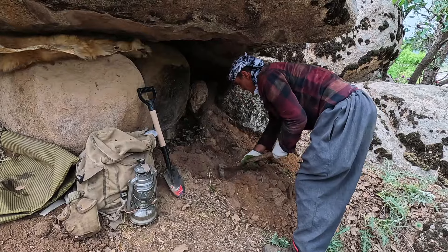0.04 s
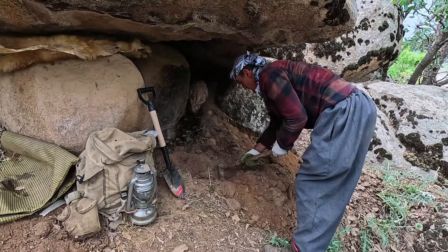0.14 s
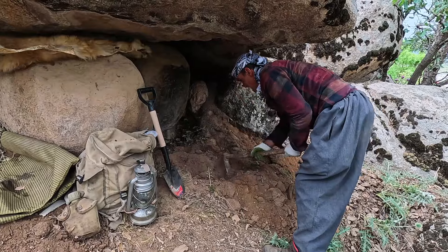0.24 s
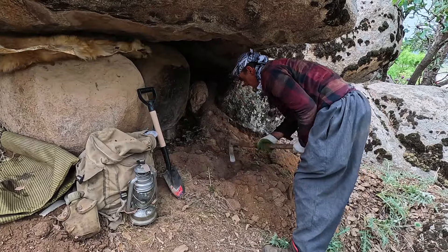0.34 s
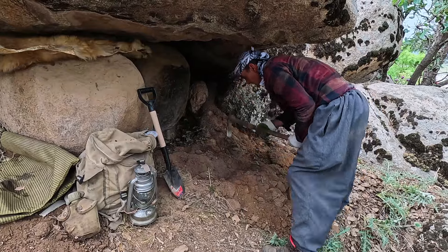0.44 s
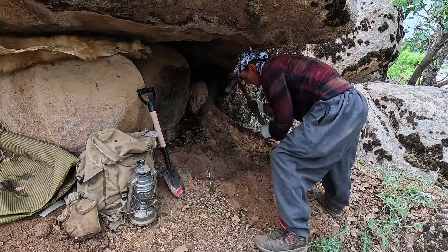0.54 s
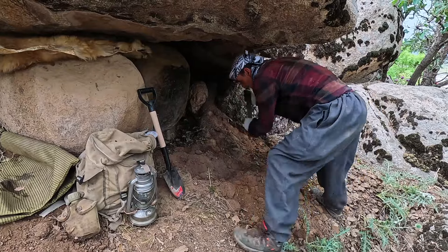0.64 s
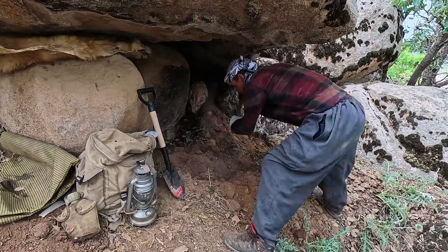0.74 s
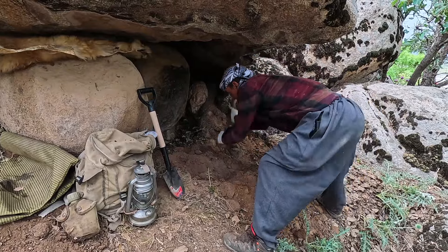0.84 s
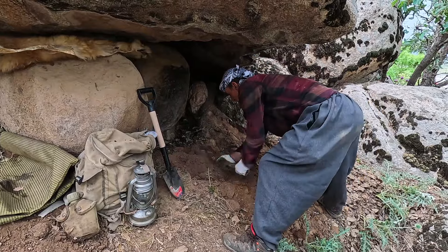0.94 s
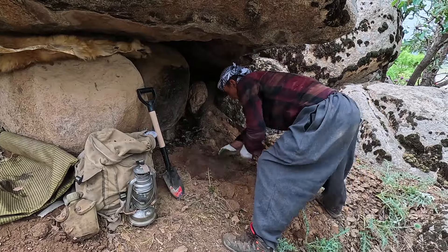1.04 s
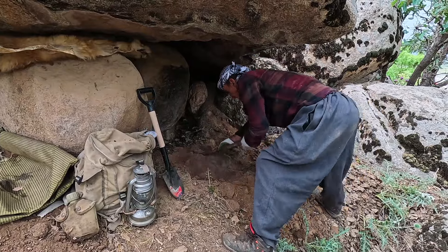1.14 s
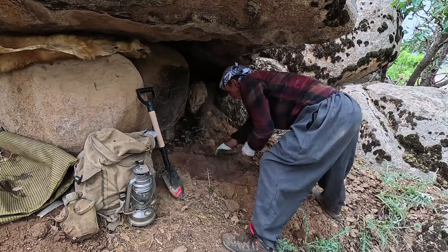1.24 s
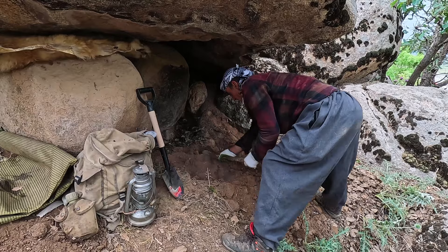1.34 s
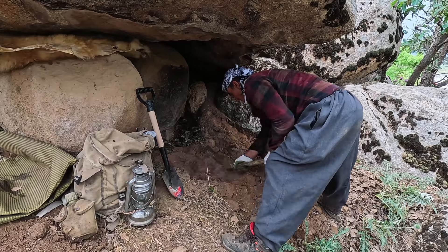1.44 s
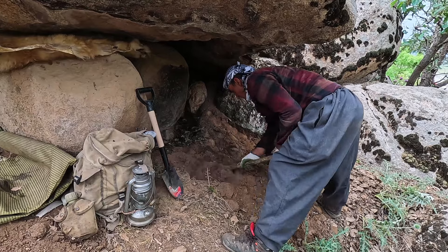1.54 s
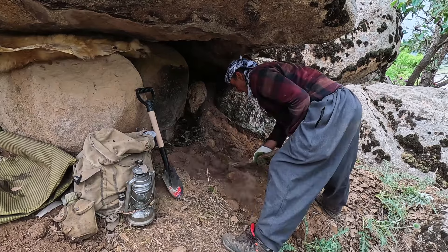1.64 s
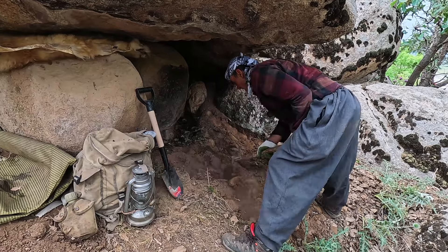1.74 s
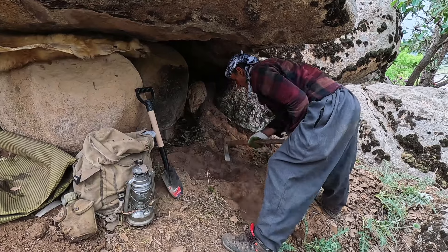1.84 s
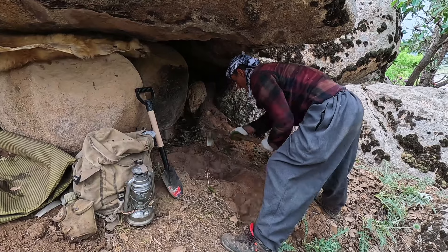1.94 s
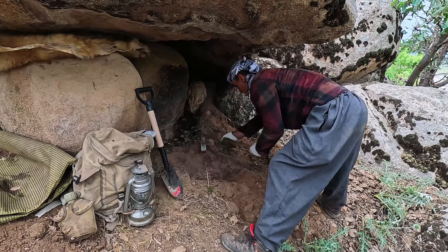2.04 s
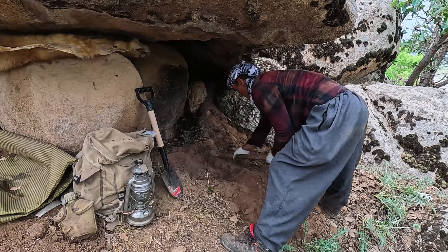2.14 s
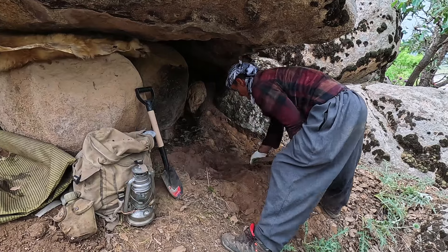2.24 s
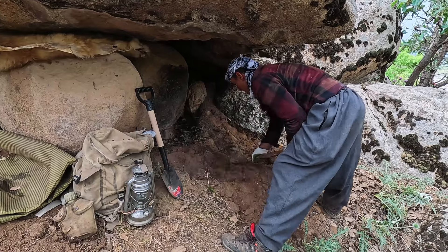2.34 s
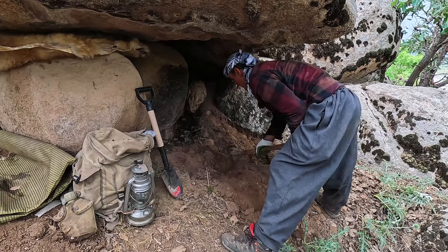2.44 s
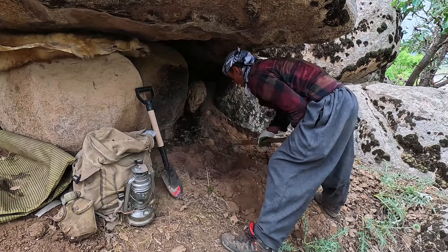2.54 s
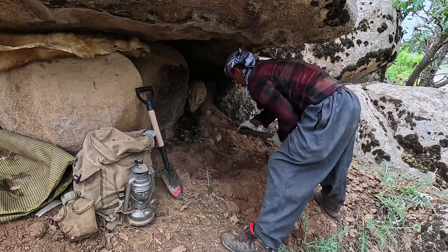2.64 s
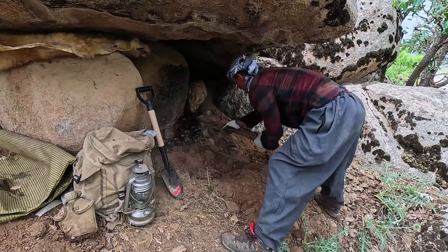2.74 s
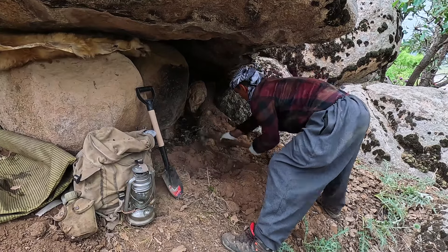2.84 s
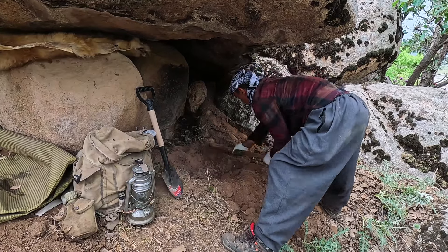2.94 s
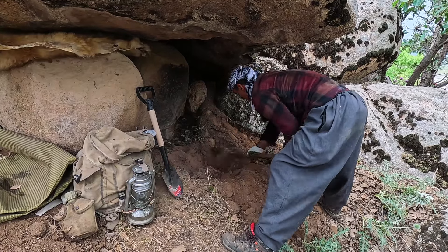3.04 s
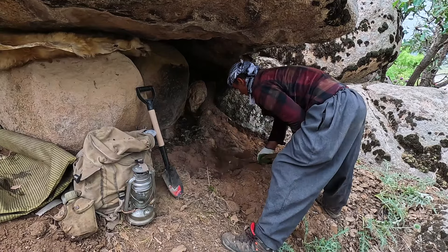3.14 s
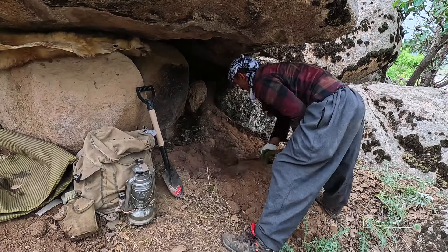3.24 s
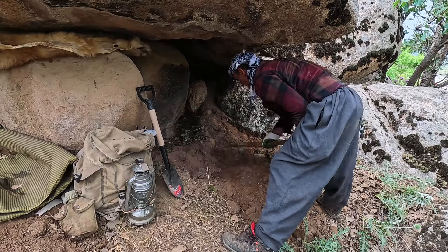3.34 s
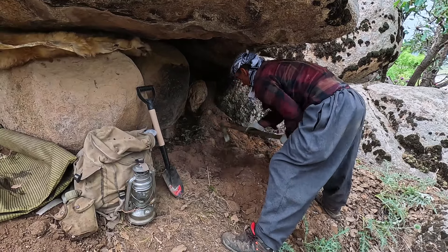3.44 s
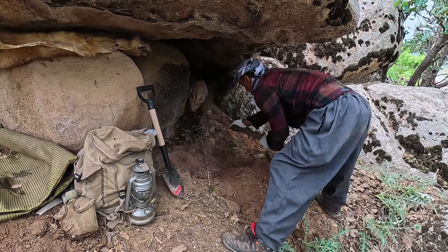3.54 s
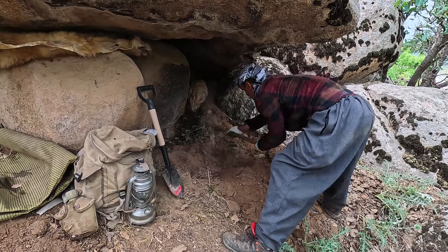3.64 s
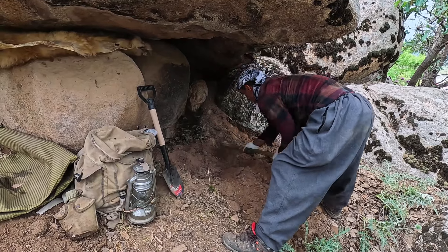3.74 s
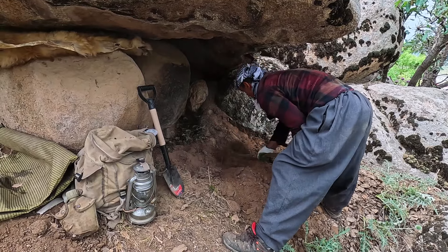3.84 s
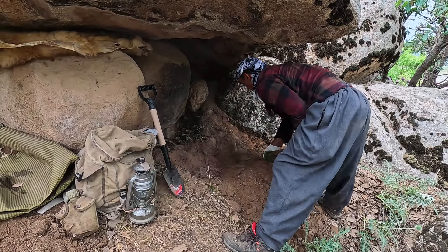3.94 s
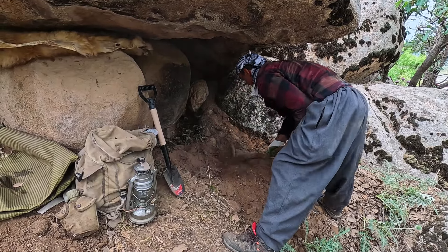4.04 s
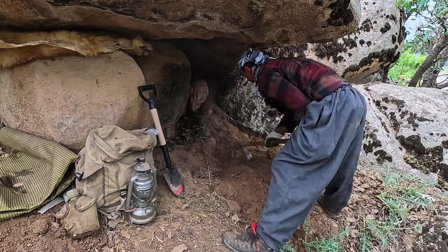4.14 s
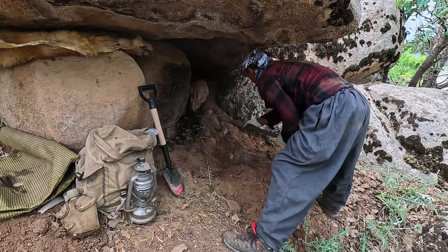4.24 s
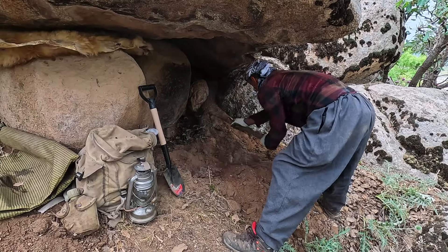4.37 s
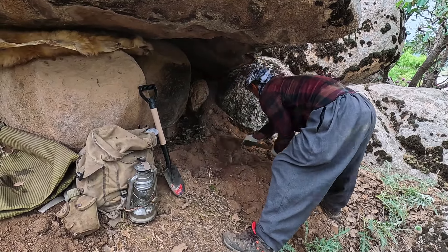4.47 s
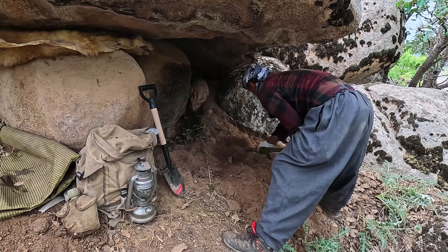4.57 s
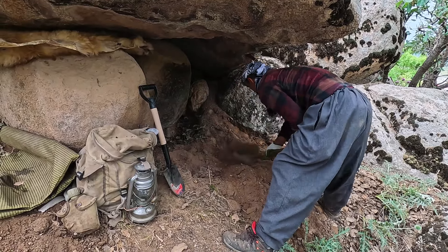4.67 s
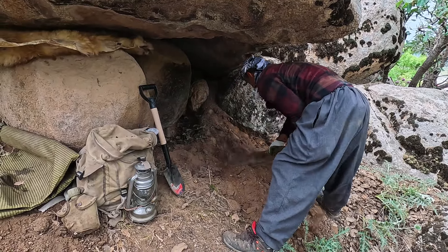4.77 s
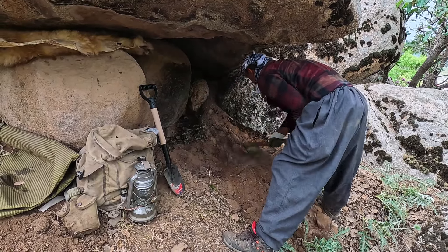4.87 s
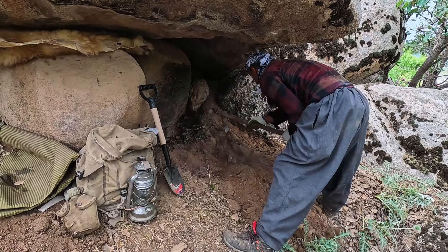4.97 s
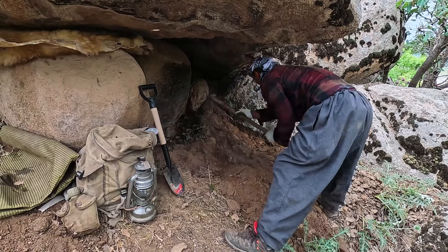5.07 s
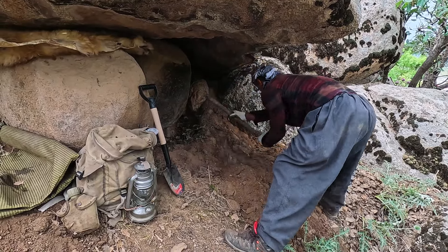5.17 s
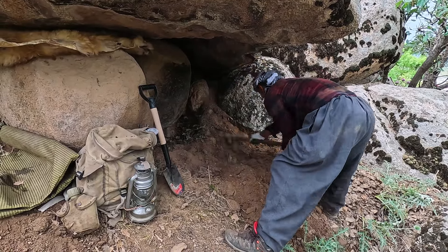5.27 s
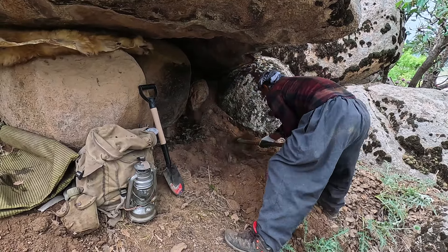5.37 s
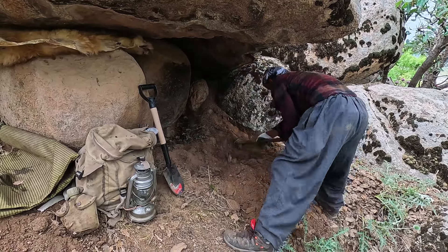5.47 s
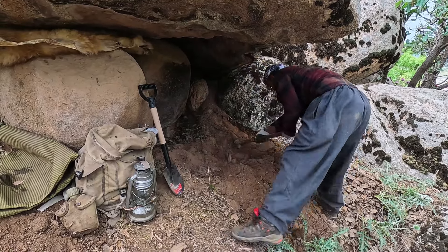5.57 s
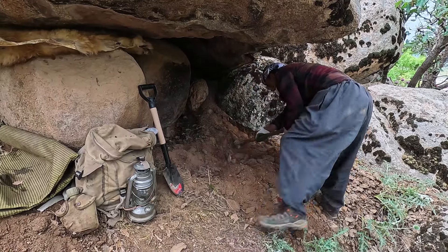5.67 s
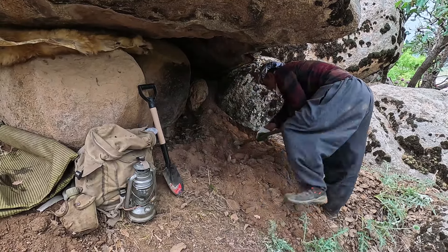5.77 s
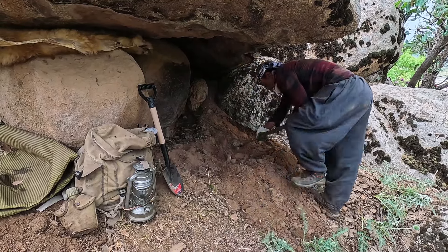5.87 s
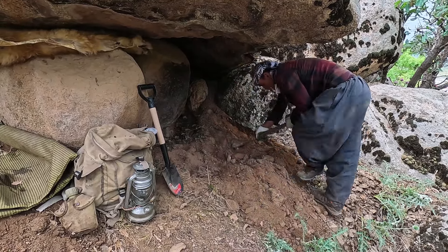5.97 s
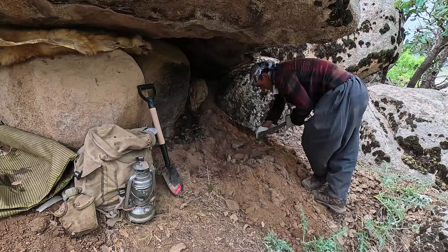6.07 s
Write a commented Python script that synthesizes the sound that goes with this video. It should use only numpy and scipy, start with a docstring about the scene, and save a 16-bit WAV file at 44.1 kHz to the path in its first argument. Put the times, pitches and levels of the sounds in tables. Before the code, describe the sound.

A short pick-mattock digs dry stony soil under a rock overhang, a few steps from the microphone. Irregular chops ring the steel blade briefly, and gritty scrapes follow as it drags through the earth. Clods crumble, gravel runs down a heap and pebbles click, most thickly near the end. Dull low thuds bump the microphone, mainly at the start. The rock gives a very short reflection.

```python
"""Under a rock overhang, a few steps from a camera: a short pick-mattock works dry stony soil.
The steel blade rings briefly at each blow and while it scrapes; clods crumble, gravel spills
and pebbles click, with a short answer from the rock. Low thuds reach the camera body;
its two microphones are nearly deaf to airborne bass."""
import sys
import numpy as np
from scipy import signal
from scipy.fft import rfft, irfft, next_fast_len
from scipy.io import wavfile
from scipy.ndimage import uniform_filter1d

SR = 44100
rng = np.random.default_rng(int(sys.argv[2]) if len(sys.argv) > 2 else 0)


def log_audio(samples):
    """Write samples as a 16-bit WAV file to the path given in sys.argv[1]."""
    # one column per channel
    frames = np.atleast_2d(samples).T
    # limit to full scale, then quantise
    limited = np.clip(frames, -1, 1)
    pcm = np.round(limited * 32767).astype(np.int16)
    wavfile.write(sys.argv[1], SR, pcm)


N = 269451


def amp(db):
    return 10 ** (np.asarray(db) / 20)


def unit(x):
    return x / np.sqrt(np.mean(x ** 2) + 1e-20)


def along(points, hz):
    """Reads (freq_hz, value) points on a log frequency axis."""
    f, v = np.transpose(points)
    return np.interp(np.log(hz + 1), np.log(f + 1), v)


def filtered(x, response):
    """x times a complex response of frequency."""
    size = next_fast_len(x.shape[-1] + 4096)
    return irfft(rfft(x, size) * response(np.fft.rfftfreq(size, 1 / SR)), size)[..., :x.shape[-1]]


def resonant(x, modes):
    """x through resonances (pitch_hz, width_hz, level_db) of alternating sign, at rms 1."""
    def response(f):
        return sum((-1) ** k * amp(db) * 1j * f * width / (hz * hz - f * f + 1j * f * width)
                   for k, (hz, width, db) in enumerate(modes))
    return unit(filtered(x, response))


def coloured(x, spectrum):
    """x shaped by (freq_hz, level_db) points, at rms 1."""
    return unit(filtered(x, lambda hz: amp(along(spectrum, hz))))


def grit(per_s, spread_db, life_s, bed):
    """Noise broken into dying grains, a few of them large, over a smooth bed."""
    starts = (rng.random(N) < per_s / SR) * amp(spread_db * np.minimum(rng.exponential(size=N), 4))
    grains = signal.lfilter([1], [1, -np.exp(-1 / (life_s * SR))], starts)
    return (unit(grains) + bed) * rng.standard_normal(N)


def patchy(x, depth_db, bins, frames):
    """Random patches of gain over time and frequency: the contact keeps changing what sounds."""
    spectra = signal.stft(x, nperseg=256)[2]
    patches = uniform_filter1d(rng.standard_normal(spectra.shape), bins, axis=0)
    patches = uniform_filter1d(patches, frames, axis=1)
    return unit(signal.istft(spectra * amp(depth_db * unit(patches)), nperseg=256)[1][:N])


def swells(rows):
    """Envelope of gestures (start_s, rise_s, hold_s, fall_s, level_db); a rise or fall spans 40 dB."""
    t = np.arange(0, N / SR + .002, .001)
    start, rise, hold, fall, db = np.transpose(rows)[..., None]
    top = start + rise
    early = np.clip((top - t) / (rise + .001), 0, 4) ** 1.3  # rounded at the top
    late = np.clip((t - top - hold) / (fall + .001), 0, 4) ** 0.9
    power = amp(db - 40 * (early + late)) ** 2
    return np.interp(np.arange(N) / SR, t, np.sqrt(power.sum(axis=0)))


def add(track, start_s, sound, peak_db):
    """Lays a short sound into a track at a given peak."""
    part = track[round(start_s * SR):][:len(sound)]
    part += amp(peak_db) / np.abs(sound).max() * sound[:len(part)]


# crunching soil and fine grit: freq_hz, level_db
SOIL_SPECTRUM = [(290, -68), (500, -1), (1600, -6.5), (2500, 0), (3700, -5), (5470, -11), (7750, -12.5),
                 (12900, -36.5), (16000, -57)]
GRIT_SPECTRUM = [(3000, -35.5), (4500, -12.5), (6500, 0), (7500, -2), (9700, -6.5), (11500, -19),
                 (14000, -25), (16000, -37.5)]
# modes of the steel head: pitch_hz, width_hz, level_db
STEEL_LOW_MODES = [(1590, 260, -2), (2150, 140, -3), (2920, 170, -2), (3800, 240, 0), (4780, 140, -5)]
STEEL_HIGH_MODES = [(6100, 70, 1), (7150, 450, -8), (7900, 190, -5), (9320, 120, -2), (11500, 200, -12)]
# pulls through the soil, a few steps away: start_s, rise_s, hold_s, fall_s, level_db
BLADE_PULLS = [(0.0, 0.0033, 0.16, 0.19, -69), (.22, 0.052, 0.021, 0.17, -52),
               (0.762, 0.035, 0.012, 0.17, -60.5), (0.985, 0.017, .02, 0.55, -55.5),
               (1.4, 0.13, 0.13, 0.25, -57), (1.944, 0.096, 0.048, 0.1, -64.5),
               (2.165, 0.028, 0.0064, 0.18, -38.5), (2.2, 0.056, 0.056, 0.24, -43),
               (2.402, 0.038, 0.11, .1, -51), (2.55, 0.033, 0.1, 0.12, -64),
               (2.904, 0.089, 0.0084, 0.28, -41), (3.0, 0.074, 0.025, 0.29, -41.5),
               (3.15, 0.052, 0.024, 0.094, -54), (3.77, 0.036, .02, 0.31, -42.5),
               (3.88, 0.051, 0.019, 0.12, -50), (4.018, .02, .02, 0.12, -73.5),
               (4.539, 0.018, 0.067, .2, -44), (4.58, 0.057, 0.052, 0.25, -42),
               (4.7, 0.031, 0.065, 0.074, -55.5), (4.945, 0.13, 0.058, 1, -58.5),
               (5.34, 0.038, 0.026, 0.31, -43), (5.812, 0.042, 0.012, 0.34, -82)]

def blade_drags():
    """Grit rubs under the blade and excites the steel."""
    rub = grit(400, spread_db=3, life_s=.003, bed=1.2)
    crunch = coloured(rub, SOIL_SPECTRUM)
    steel = resonant(crunch, STEEL_LOW_MODES)
    steel += amp(-10) * resonant(coloured(rub, GRIT_SPECTRUM), STEEL_HIGH_MODES)
    return swells(BLADE_PULLS) * patchy(steel + .45 * crunch, depth_db=3.5, bins=3, frames=10)


# running gravel: freq_hz, level_db
GRAVEL_SPECTRUM = [(1500, -30.5), (2200, 6), (3500, 8), (5000, 7), (6500, -22.5), (10000, -51.5)]
# slides on the heap: start_s, rise_s, hold_s, fall_s, gravel_db, grit_db
SOIL_SLIDES = [(0.0, 0.0033, 0.12, 0.26, -73.5, -75.5), (0.265, 0.11, 0.016, 0.28, -67.5, -69.5),
               (0.397, 0.13, 0.067, 0.24, -74, -62.5), (0.754, 0.027, 0.0093, 0.3, -52.5, -47.5),
               (0.973, 0.045, 0.02, 0.53, -59.5, -58), (1.238, 0.018, 0.012, 0.4, -71.5, -63.5),
               (1.46, 0.033, .12, 0.11, -90, -74), (1.777, 0.046, 0.016, 0.25, -72, -62.5),
               (1.913, 0.0076, 0.19, 0.24, -65, -56.5), (2.175, 0.034, 0.14, 0.22, -66, -54.5),
               (2.43, 0.022, .08, 0.23, -63, -64), (2.652, 0.025, .02, 0.76, -91, -67.5),
               (2.773, 0.073, 0.033, .05, -89.5, -74), (2.875, 0.036, 0.046, .15, -62, -51),
               (3.018, 0.024, 0.027, 0.32, -50.5, -48), (3.165, 0.053, 0.017, .13, -56, -55),
               (3.543, .02, .01, 0.39, -73.5, -54.5), (3.706, 0.012, .01, 0.21, -73.5, -56.5),
               (3.762, 0.016, 0.12, 0.24, -52.5, -54.5), (4.031, 0.011, 0.023, 0.18, -53, -57),
               (4.321, .01, 0.009, 0.14, -95.5, -87), (4.45, 0.086, 0.023, .05, -90, -79.5),
               (4.556, 0.014, .02, 0.25, -55, -69), (4.904, 0.023, 0.028, 0.9, -55.5, -53.5),
               (5.007, 0.08, 0.041, 0.75, -45.5, -46), (5.331, 0.054, 0.062, 0.47, -51.5, -51),
               (5.66, 0.034, 0.007, 0.15, -61.5, -55), (5.789, 0.034, 0.049, .1, -72, -80),
               (5.846, 0.034, 0.0095, 0.18, -56.5, -61), (5.933, 0.051, 0.011, 0.13, -66, -61.5)]

def gravel_spills():
    """Gravel and fine grit run down the heap, with stray pebbles among them."""
    running = patchy(grit(700, spread_db=3.5, life_s=.002, bed=1.6), depth_db=2.2, bins=6, frames=10)
    strays = patchy(grit(60, spread_db=2.5, life_s=.004, bed=0), depth_db=5, bins=8, frames=4)
    falling = running + amp(-7) * strays
    gravel = swells([row[:5] for row in SOIL_SLIDES]) * coloured(falling, GRAVEL_SPECTRUM)
    trickle = swells([(*row[:4], row[5]) for row in SOIL_SLIDES]) * coloured(falling, GRIT_SPECTRUM)
    return gravel + trickle


# breaking clods: freq_hz, level_db
CLOD_SPECTRUM = [(500, -41.5), (750, -11.5), (950, -1), (1400, -7), (2200, -19), (4000, -37)]
# each break-up: start_s, rise_s, hold_s, fall_s, level_db
CLOD_BREAKS = [(0.0, 0.0033, 0.0092, 0.55, -56.5), (.26, 0.061, .05, 0.53, -54.5),
               (.77, .02, 0.0052, 0.23, -42), (1.0, 0.02, .01, 0.33, -47.5), (1.15, 0.13, 0.4, .2, -75),
               (1.4, 0.16, 0.064, 0.66, -63), (1.85, 0.14, 0.49, 0.057, -73), (2.17, 0.066, .01, 0.33, -51),
               (2.41, 0.052, 0.094, 0.077, -46.5), (2.55, 0.017, 0.12, 0.2, -58.5),
               (2.93, 0.045, 0.017, 0.16, -42.5), (3.0, 0.023, .05, 0.39, -60),
               (3.18, 0.055, 0.016, 0.21, -61), (3.72, 0.093, 0.013, 0.28, -47.5),
               (4.03, 0.024, 0.011, 0.19, -62.5), (4.32, 0.092, .12, 0.045, -77.5),
               (4.54, 0.018, .02, 0.45, -44), (4.68, 0.034, 0.015, 0.11, -64),
               (4.92, 0.065, .05, 0.23, -67.5), (5.0, 0.18, 0.15, .1, -57),
               (5.36, 0.047, 0.068, 0.29, -46.5), (5.64, 0.047, 0.011, 0.87, -65.5),
               (5.8, 0.069, 0.0082, 0.37, -65)]

def crumbling_clods():
    """Dry clods break up in dull grains."""
    crumbs = grit(250, spread_db=3, life_s=.005, bed=1.3)
    return swells(CLOD_BREAKS) * coloured(crumbs, CLOD_SPECTRUM)


# two bands of rumble in the camera body: freq_hz, level_db
DEEP_SPECTRUM = [(15, -1), (30, 3), (55, -10.5), (85, -3), (125, -13), (300, -58), (600, -120)]
UPPER_SPECTRUM = [(40, -60), (80, -27), (150, -4.5), (350, -4), (500, -15), (800, -27), (1500, -120)]
# rumble between shakes: time_s, deep_db, upper_db
RESTING_RUMBLE = [(0.0, -70, -80.5), (3.25, -78.5, -91), (3.5, -74, -100), (4.0, -78, -95.5),
                  (5.0, -79.5, -89), (5.598, -79, -87), (6.11, -82.5, -102)]
# shakes: start_s, rise_s, deep_fall_s, deep_db, upper_db
BODY_SHAKES = [(0.0, 0.012, 0.33, -45, -53), (.26, 0.037, 0.35, -60, -69.5),
               (.47, 0.011, 0.23, -49.5, -52.5), (.76, 0.031, 0.22, -73, -69.5),
               (1.0, 0.037, 0.27, -59, -72.5), (1.3, 0.33, 0.3, -84, -83), (2.15, .1, 0.17, -82, -84),
               (2.44, 0.078, 0.21, -69, -59.5), (2.92, 0.064, 0.54, -71, -73.5),
               (3.25, .1, 0.13, -53, -75.5), (3.75, 0.055, 0.56, -68.5, -73),
               (4.24, 0.042, 0.11, -84.5, -104), (4.45, 0.21, 0.59, -67, -72),
               (5.36, .04, 0.32, -64, -63.5)]
# single bumps: start_s, peak_db, pitch_hz
BODY_BUMPS = [(.003, -39, 146), (0.02, -39.5, 44.6), (0.055, -47.5, 90), (0.119, -49, 49),
              (0.303, -47.5, 112), (.481, -38, 270), (0.483, -45.5, 574), (0.493, -37, 51.7),
              (0.515, -42, 70.5), (1.042, -58.5, 92), (2.519, -54, 39.3), (3.349, -51.5, 42.6),
              (5.393, -47, 100)]

def camera_thuds():
    """The camera body shakes and bumps, stronger at the right microphone."""
    times, *rest_db = np.transpose(RESTING_RUMBLE)
    deep, upper = [amp(np.interp(np.arange(N) / SR, times, db)) for db in rest_db]
    hold_s = .022
    deep += swells([(s, rise, hold_s, fall, db) for s, rise, fall, db, _ in BODY_SHAKES])
    upper += swells([(s, rise, hold_s, .8 * fall, db) for s, rise, fall, _, db in BODY_SHAKES])
    lumps = grit(52, spread_db=4, life_s=.0015, bed=3)
    shake = deep * coloured(lumps, DEEP_SPECTRUM) + upper * coloured(lumps, UPPER_SPECTRUM)
    t = np.arange(SR // 8) / SR
    for start_s, peak_db, hz in BODY_BUMPS:
        bump = np.sin(2 * np.pi * hz * t) * t * np.exp(-2.2 * hz * t)  # one or two cycles
        add(shake, start_s, bump, peak_db)
    wide = deep * coloured(rng.standard_normal((2, N)), DEEP_SPECTRUM)
    wide += upper * coloured(rng.standard_normal((2, N)), UPPER_SPECTRUM)
    return shake * amp([[-3], [2.5]]) + amp(-10) * wide


# background under the overhang: freq_hz, level_db
AIR_SPECTRUM = [(180, -39.5), (300, -7.5), (667, -6.5), (1010, 0.5), (1970, -15), (5800, -9), (7080, -16.5),
                (12500, -16.5), (16000, -8.5)]

def air():
    """A faint steady hiss, different in each microphone."""
    return amp(-81.5) * coloured(rng.standard_normal((2, N)), AIR_SPECTRUM)


# single pebbles by the tool: start_s, peak_db, pitch_hz
PEBBLE_HITS = [(.0862, -49.5, 2110), (.1462, -48.5, 2160), (.3765, -47, 1420), (0.554, -46, 7960),
               (0.7741, -34.5, 3700), (0.9449, -42, 7600), (1.1656, -47, 7400), (1.256, -41.5, 4980),
               (1.519, -46, 3300), (1.8292, -47, 3250), (1.8975, -32.5, 8230), (1.9017, -41.5, 4320),
               (2.0014, -42.5, 3420), (2.0148, -34.5, 8800), (2.055, -42, 3440), (2.2453, -32, 3950),
               (2.2887, -30.5, 7300), (2.6868, -39, 6980), (2.7338, -37.5, 9730), (2.903, -51, 8860),
               (2.9172, -40.5, 3860), (3.025, -46, 3740), (3.0485, -38.5, 2550), (3.5714, -34, 6200),
               (3.6677, -46.5, 7340), (3.721, -43, 5700), (3.8262, -38, 3830), (4.0934, -36.5, 4890),
               (4.231, -66.5, 4230), (4.332, -65, 5570), (4.6613, -35.5, 3840), (4.6852, -40, 1720),
               (4.859, -50.5, 7800), (4.9184, -38.5, 3300), (4.9283, -25.5, 6930), (5.0733, -35, 5100),
               (5.0895, -28.5, 7300), (5.129, -31, 5400), (5.1436, -33, 5000), (5.217, -35.5, 3370),
               (5.271, -33, 3550), (5.4944, -38, 3100), (5.6984, -44, 2570), (5.8593, -47, 4850),
               (5.881, -33, 5100)]

def pebble_clicks(t60_s=.039):
    """Each pebble gives a sharp tick with a broad pitch of its own."""
    track, t = np.zeros(N), np.arange(SR // 12) / SR
    for start_s, peak_db, hz in PEBBLE_HITS:
        tick = rng.standard_normal(len(t)) * (amp(-60 * t / t60_s) + 2.2 * np.exp(-t / .0004))
        ring = resonant(resonant(tick, [(hz, .8 * hz, 0)]), [(hz, .18 * hz, 0)])
        add(track, start_s, ring + .35 * coloured(tick, GRIT_SPECTRUM), peak_db)
    return track


# the blade meets stone, a few steps away; levels are peaks, and a harder contact tilts brighter:
# start_s, t60_s, crunch_db, tilt_db_per_octave, low_steel_db, high_steel_db, stone_hz, knock_db
BLADE_STRIKES = [(0.253, 0.17, -41, 11, -34.5, -53.5, 1290, -48.5),
                 (.264, .12, -21, -15.5, -40, -37, 1484, -31.5),
                 (.277, 0.037, -48, -13, -25, -37, 1250, -28),
                 (0.286, 0.013, -47, -8, -24.5, -28, 1570, -23.5),
                 (0.312, 0.013, -70, 5, -39, -35, 2930, -39), (0.779, 0.15, -41, -25, -50, -76, 1050, -34),
                 (1.021, 0.068, -26, 7.5, -26, -34.5, 2240, -27.5),
                 (1.026, 0.031, -28, -7, -26, -24.5, 2660, -30),
                 (1.559, 0.13, -48, 1, -40.5, -51, 1345, -42.5),
                 (2.169, .047, -45, 18, -65, -46.5, 2860, -65),
                 (2.193, .065, -43.5, 15, -32.5, -33.5, 1650, -35),
                 (2.459, 0.036, -23.5, -5, -40, -40.5, 1410, -29.5),
                 (2.466, 0.11, -21, -7, -28, -41.5, 1930, -31),
                 (2.489, 0.027, -31.5, -11, -37, -44, 1535, -20),
                 (2.513, 0.021, -43.5, -14.5, -23, -34.5, 1566, -14),
                 (2.531, 0.012, -29, -18.5, -42, -41.5, 1523, -17.5),
                 (2.955, 0.061, -16.5, 10, -15.5, -26, 2227, -22),
                 (3.776, 0.031, -25, 16, -18, -18.5, 2242, -29.5),
                 (3.786, .052, -24, 6.5, -27.5, -42, 1690, -45),
                 (4.045, 0.057, -59, -4.5, -38, -46.5, 2350, -46),
                 (4.553, 0.064, -29.5, 2, -28.5, -28.5, 2122, -28),
                 (5.371, 0.073, -22, 6, -21.5, -45, 1507, -25.5),
                 (5.38, 0.049, -20.5, 0.5, -34, -24.5, 1074, -26),
                 (5.401, 0.048, -20, 1.5, -61, -42.5, 3108, -43),
                 (5.444, 0.029, -27.5, -11, -55, -53, 3130, -37)]

def blade_blows():
    """Soil breaks in a burst that rings the steel; the first push knocks stone and thumps the ground."""
    def struck(modes):
        return [(hz, width, db + rng.normal(0, 2.5)) for hz, width, db in modes]

    track, t = np.zeros(N), np.arange(SR // 4) / SR
    for start_s, t60_s, crunch_db, tilt, low_db, high_db, stone_hz, knock_db in BLADE_STRIKES:
        bite = 1 - np.exp(-t / (.037 * t60_s))
        burst = rng.standard_normal(len(t)) * amp(-60 * t / t60_s) * bite
        tilted = filtered(burst, lambda hz: amp(tilt * np.log2(1 + hz / 2000)))
        add(track, start_s, coloured(tilted, SOIL_SPECTRUM), crunch_db)
        add(track, start_s, resonant(burst, struck(STEEL_LOW_MODES)), low_db)
        add(track, start_s, resonant(coloured(burst, GRIT_SPECTRUM), struck(STEEL_HIGH_MODES)), high_db)
        push = t * np.exp(-t / .0001) + .00001 * burst  # one push, then crumbs
        swelling = resonant(push, [(stone_hz, 350, 0)]) + .48 * unit(push)  # builds in a cycle or two
        knock = resonant(swelling, [(stone_hz, 130, 0), (2 * stone_hz, 500, -6)])
        add(track, start_s, knock, knock_db)
        thump = resonant(push, [(303, 89, 1.5), (726, 310, .1)])
        add(track, start_s, thump, knock_db - 11 - .71 * tilt)  # a soft contact thumps more
    return track


# reflections off nearby edges: freq_hz, gain_db
EDGE_SPECTRUM = [(1000, -22), (4000, -16), (8000, -9), (12000, -1)]

def rock_edges(x):
    """Nearby rock edges send each microphone a few milliseconds of its own treble."""
    t = np.arange(SR // 100) / SR
    fan = rng.standard_normal((2, len(t))) * np.exp(-t / .0029)
    copies = signal.fftconvolve(x, fan / np.linalg.norm(fan[0]), axes=1)[:, :N]
    return filtered(copies, lambda hz: amp(along(EDGE_SPECTRUM, hz)))


# the rock overhead: freq_hz, t60_s
OVERHANG_DECAY = [(500, 0.081), (2000, 0.08), (10000, 0.24)]

def overhang(x):
    """The rock answers each channel differently; each frequency dies at its own speed."""
    hz, t, noise = signal.stft(rng.standard_normal((2, SR // 3)), SR, nperseg=256)
    decay = amp(-60 * t / along(OVERHANG_DECAY, hz)[:, None])
    tail = signal.istft(noise * decay, SR, nperseg=256)[1]
    delayed = np.pad(x, ((0, 0), (90, 0)))  # 2 ms
    return signal.fftconvolve(delayed, tail / np.linalg.norm(tail[0]), axes=1)[:, :N]


# colour between the microphone ports: freq_hz, left_minus_right_db
PORT_BALANCE = [(700, 1.5), (1290, -2.5), (2380, 0.5), (4400, -1.5), (8120, 0.5), (12000, 6), (15000, 4.5)]
# phase between them: freq_hz, left_lag_rad
PORT_LAG = [(700, 0.075), (1200, 0.26), (2900, 1), (4200, 0.41), (5500, 0.8), (10000, 0.26), (14000, 0)]
SIDES = np.array([[.5], [-.5]])  # left, right

def microphone_ports(x, cut_hz=786, leak_db=-25):
    """Airborne sound loses its bass and reaches the two ports with unlike colour and phase."""
    def response(hz):
        bass_cut = (1j * hz / (cut_hz + 1j * hz)) ** 2 / np.sqrt(1 + (cut_hz / (hz + 1)) ** 8)
        balance = amp(SIDES * along(PORT_BALANCE, hz))
        phase = np.exp(-1j * SIDES * along(PORT_LAG, hz))
        return (bass_cut - amp(leak_db)) * balance * phase
    return filtered(x, response)


# where the tool works, heard from the camera: time_s, left_minus_right_db
TOOL_POSITION = [(0.0, -2.5), (.4, 0), (3.16, -0.5), (3.488, -3.5), (3.849, 0), (4.101, -2.5),
                 (4.781, -0.5), (4.9, -2), (5.7, -1.5), (6.11, -4)]

def scene():
    """The digging and its reflections arrive through the air, the thuds through the camera body."""
    work = blade_blows() + pebble_clicks() + blade_drags() + gravel_spills() + crumbling_clods()
    balance_db = np.interp(np.arange(N) / SR, *np.transpose(TOOL_POSITION))
    direct = work * amp(SIDES * balance_db)
    hiss = air()
    airborne = direct + amp(2) * rock_edges(direct) + amp(-11.5) * overhang(direct)
    return microphone_ports(airborne) + hiss + camera_thuds()


# microphone treble: freq_hz, gain_db
TREBLE_DROOP = [(12000, -1.5), (14500, -6), (15700, -16)]
BAND_LIMIT_HZ = 15700

def record(dry):
    """The microphones droop in the top octave; the camera keeps nothing above its band limit."""
    return filtered(dry, lambda hz: amp(along(TREBLE_DROOP, hz)) * (hz < BAND_LIMIT_HZ))


dry = scene()
out = record(dry)
log_audio(out)
```